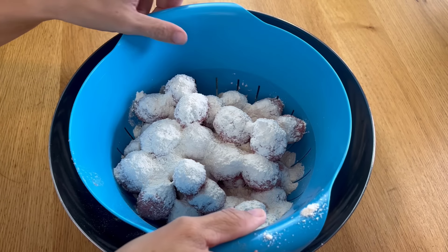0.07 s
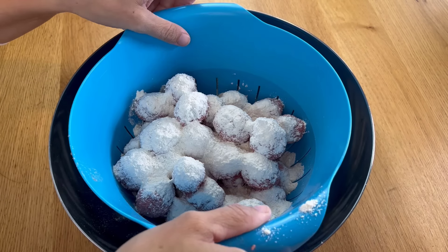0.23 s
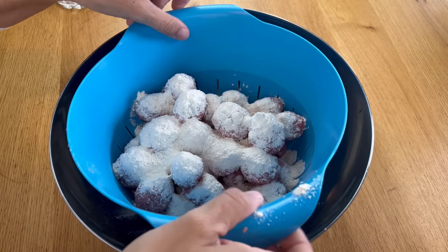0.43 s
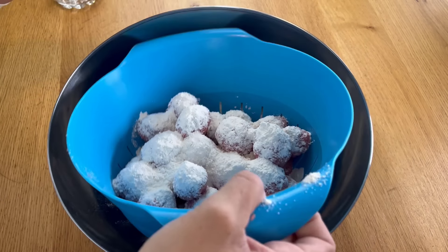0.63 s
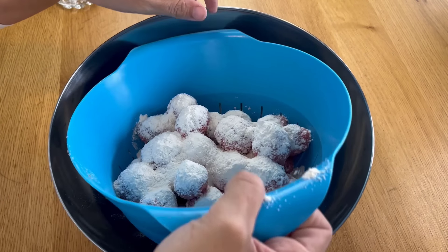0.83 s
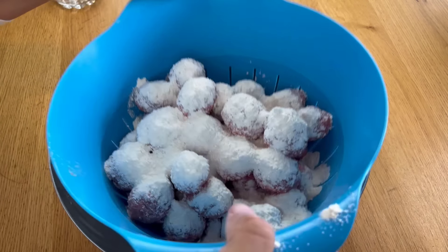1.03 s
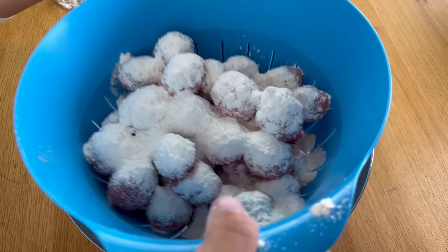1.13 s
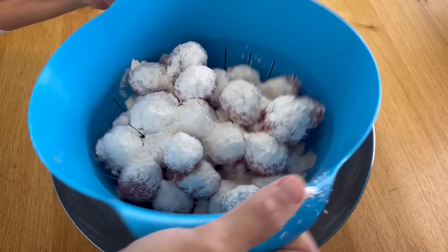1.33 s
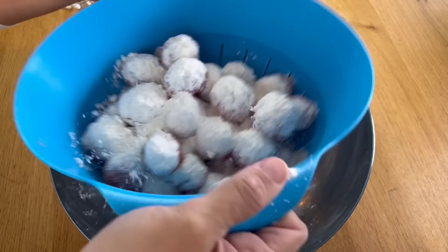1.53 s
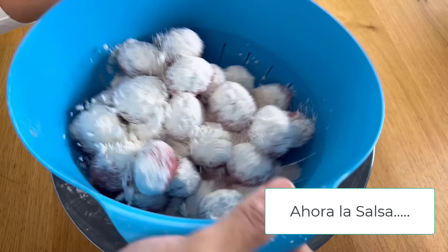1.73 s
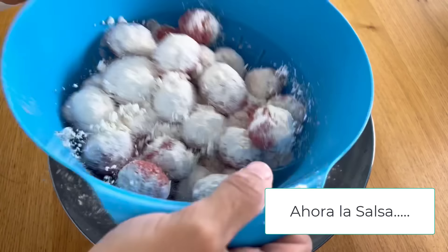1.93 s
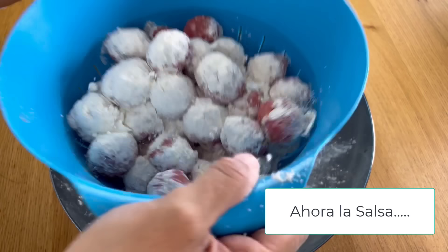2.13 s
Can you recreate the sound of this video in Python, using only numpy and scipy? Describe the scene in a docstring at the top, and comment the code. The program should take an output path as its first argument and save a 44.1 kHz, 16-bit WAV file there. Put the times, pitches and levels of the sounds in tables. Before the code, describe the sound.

Close up at a wooden kitchen table, faint scraping grows into a cluster of clattering plastic-on-metal knocks; afterwards coated balls slide and tap softly in the colander, with low air thumps and two wall snaps.

```python
"""Close microphone at a wooden table: a plastic colander of floured meatballs is worked loose from a metal bowl.
It rubs in the bowl, stick-slip grains ringing the shared modes over low rumble, sway and room noise; amid the
rubbing, blows knock those modes and a rasp swells. Lifted and shaken, the balls rustle as fine grains and tick as
very short rings; each toss swings slow air at the microphone, and twice the wall snaps with a ring, falling wave,
click and thump."""
import sys
import numpy as np
from scipy import signal
from scipy.fft import rfft, irfft
from scipy.io import wavfile

SR = 44100
rng = np.random.default_rng(int(sys.argv[2]) if len(sys.argv) > 2 else 0)


def unload_audio(sound):
    """Save the sound as a 16-bit wav file, at the path given as the first command line argument."""
    columns = np.transpose(np.atleast_2d(sound))
    # keep every value between -1 and 1, then stretch to whole-number steps
    steps = np.round(np.clip(columns, -1, 1) * 32767)
    wavfile.write(sys.argv[1], SR, steps.astype(np.int16))


N = 96226


def undb(db):
    """Decibels to amplitude."""
    return 10 ** (np.asarray(db, float) / 20)


def unit(x):
    """Scale to an RMS of one."""
    return x / np.sqrt(np.mean(x ** 2))


def curve(table, column):
    """Gain over time from a dB column; -120 dB outside the table."""
    rows = np.array(table, float)
    level_db = np.interp(np.arange(N) / SR, rows[:, 0], rows[:, column], left=-120, right=-120)
    return undb(level_db)


def ring(x, pitch_hz, t60_s):
    """One decaying mode driven by x: a two-pole resonator."""
    radius = np.exp(-np.log(1000) / (t60_s * SR))
    angle = 2 * np.pi * pitch_hz / SR
    return signal.lfilter([np.sin(angle)], [1, -2 * radius * np.cos(angle), radius ** 2], x)


def band(x, low_hz, high_hz):
    """Keep one band of frequencies."""
    return signal.sosfilt(signal.butter(2, [low_hz, high_hz], "band", fs=SR, output="sos"), x)


def colour(x, table):
    """Shape the spectrum by a table, falling away below its first frequency, at an RMS of one."""
    pitch_hz, level_db = np.array(table, float).T
    f = np.fft.rfftfreq(N, 1 / SR)
    gain = undb(np.interp(np.log(f + 1), np.log(pitch_hz), level_db))
    low_cut = np.minimum(f / pitch_hz[0], 1) ** 2
    return unit(irfft(rfft(x) * gain * low_cut, N))


def grains(per_s, spread_db):
    """Random clicks of uneven size."""
    struck = rng.random(N) < per_s / SR
    return struck * rng.standard_normal(N) * undb(spread_db * rng.exponential(size=N))


def push(peak_s):
    """Soft contact: a smooth bump of force that peaks after peak_s."""
    t = np.arange(400) / SR / peak_s
    return t * np.exp(1 - t) / (peak_s * SR * np.e)


def add(out, start_s, sound):
    """Lay a sound into the scene at its start."""
    i = int(start_s * SR)
    out[i:i + len(sound)] += sound[:N - i]


# Modes of colander and bowl together, rung by both rubbing and knocks: pitch_hz, level_db, t60_s
BODY_MODES = [(140.4, -10, 0.085), (176, -3, 0.053), (217.6, 4.5, 0.056), (289.3, -6, 0.11),
              (357.7, -2.5, 0.071), (455.3, -5.5, 0.086), (552, 4.5, 0.058), (614, 1, 0.092),
              (673, 0, 0.096), (805, 3, 0.028), (960, 0.5, 0.029), (1260, -6, 0.021), (1290, 7.5, 0.013),
              (1630, 0, 0.014), (2090, -11, 0.02), (2537, 0.5, 0.013), (2870, -11, 0.012),
              (4880, -22, 0.011), (6390, -2.5, 0.012), (6870, -4, 0.016)]


def body(x):
    """Colander and bowl ring together as a bank of modes of alternating sign."""
    out = np.zeros(N)
    for k, (pitch_hz, level_db, t60_s) in enumerate(BODY_MODES):
        out += (-1) ** k * undb(level_db) * ring(x, pitch_hz, t60_s)
    return out


# Colour of the fine scraping: pitch_hz, level_db
SCRAPE_COLOUR = [(300, -15), (558, -10.5), (730, -9.5), (1330, -10.5), (1960, -14), (2700, -18.5),
                 (3660, -28.5), (4800, -37), (6190, -52), (8530, -33.5), (11100, -41), (15500, -48)]
# Rubbing in the bowl: time_s, judder_level_db, scrape_level_db, thin_ring_level_db
RUBBING = [(0, -43, -44.5, -60), (.05, -55.5, -83.5, -104), (.07, -57, -62, -59), (.1, -55.5, -71, -81),
           (.16, -57, -59, -73), (.184, -53, -59, -70), (.232, -82, -64, -76.5), (.27, -51, -67, -62),
           (.33, -66, -67.5, -76), (.39, -58, -56.5, -67), (.44, -66, -65.5, -70), (.52, -63, -47.5, -67),
           (.545, -41, -52, -60), (.585, -39, -42, -71), (.6, -59, -72, -59), (.63, -41.5, -60, -54),
           (.66, -38, -43.5, -85), (.69, -42, -59, -63), (.705, -28.5, -52, -76), (.745, -28, -53, -50),
           (.765, -32, -57.5, -77), (.798, -42, -56, -80), (.806, -23, -62, -71), (.84, -26, -52, -81),
           (.87, -32, -49, -78), (.91, -38, -66, -70), (.95, -38.5, -64.5, -73), (1.0, -49, -81, -80),
           (1.04, -58, -87, -84), (1.065, -64, -108, -67), (1.1, -64, -73, -82), (1.15, -72, -110, -90)]
JUDDER_PER_S, JUDDER_PUSH_S, SCRAPE_PER_S = 400, 0.0023 / 4, 3300


def rubbing():
    """Stick-slip judder rings the body; fine scraping and a thin treble ring ride on it."""
    slips = np.convolve(grains(JUDDER_PER_S, 1.5), push(JUDDER_PUSH_S))[:N]
    judder = unit(body(slips))
    grit = grains(SCRAPE_PER_S, 1.3)
    scrape = colour(grit, SCRAPE_COLOUR) + 0.36 * unit(band(body(grit), 650, 3300))
    thin = unit(ring(grit, 6150, 0.0065) + 0.59 * ring(grit, 7140, 0.0029))
    return judder * curve(RUBBING, 1) + scrape * curve(RUBBING, 2) + thin * curve(RUBBING, 3)


# Low rumble of the table: time_s, level_db
TABLE_RUMBLE = [(0.0, -36), (0.1, -40.5), (0.24, -47), (0.45, -87), (0.75, -56), (0.92, -41.5),
                (1.1, -50.5), (1.31, -53), (1.84, -39.5), (2.1, -43)]


def rumble():
    """The table hums low: noise through one slow resonance."""
    return unit(ring(rng.standard_normal(N), 42.6, 0.9)) * curve(TABLE_RUMBLE, 1)


SWAY_DB, SWAY_HZ = -43, 8.04


def sway():
    """A faint, very low wander of pressure throughout: band-limited noise."""
    return undb(SWAY_DB) * unit(band(rng.standard_normal(N), SWAY_HZ / 2, SWAY_HZ * 3.1))


# Colour of the room's steady noise: pitch_hz, level_db
ROOM_COLOUR = [(60, -0.5), (200, -13.5), (400, -20), (870, -27.5), (1320, -29), (2600, -33.5),
               (4480, -56.5), (6120, -49), (8530, -53), (11100, -46), (15200, -48), (15500, -83)]
ROOM_DB = -57.5


def room_noise():
    """Steady coloured noise behind everything."""
    return undb(ROOM_DB) * colour(rng.standard_normal(N), ROOM_COLOUR)


# Knocks of colander on bowl: start_s, blow_peak_db, edge_gain_db, contact_ms (to the peak of force),
# lean_db (per octave, towards the upper modes)
KNOCKS_IN_BOWL = [(.122, -51, -63, 0.039, 0), (.173, -47, -66.5, 0.14, 3.5),
                  (.2532, -32, -54.5, 0.033, 4.5), (.284, -66, -61, 0.054, 1),
                  (.388, -55, -61.5, 0.18, 5.5), (.563, -20, -40.5, 0.066, 1), (.571, -19, -44.5, 0.15, .6),
                  (.6092, -18, -39.5, 0.096, 3.5), (.699, -23, -74, 0.41, -1), (.714, -33, -44, 0.38, -1.2),
                  (.728, -22, -58, 0.27, -3), (.740, -20.5, -52, 0.38, 2.1), (0.749, -23, -64, 0.53, 1.3),
                  (.8025, -16, -54, 0.18, 0), (.815, -21.5, -67, 0.36, 3.3), (.849, -20, -40.5, 0.14, 0.6),
                  (.937, -30.5, -66, 0.74, -1.8), (.98, -61, -84, 0.11, -4)]
EDGE_S, SPOT_SPREAD_DB = 0.0041, 1


def knocks():
    """A blow and a short gritty edge ring the body; each spot struck favours other modes."""
    out, t = np.zeros(N), np.arange(7000) / SR
    pitch_hz, mode_db, t60_s = np.array(BODY_MODES, float).T[:, :, None]
    for start_s, blow_db, edge_db, contact_ms, lean_db in KNOCKS_IN_BOWL:
        lean = lean_db * np.log2(pitch_hz / 600) * (pitch_hz < 4000)  # the highest modes do not lean
        spot = undb(mode_db + lean + SPOT_SPREAD_DB * rng.standard_normal(pitch_hz.shape))
        phase_cycles = 0.5 + 0.17 * rng.standard_normal(pitch_hz.shape)
        waves = np.sin(2 * np.pi * (pitch_hz * t + phase_cycles))
        modes = np.sum(spot * waves * 1000 ** (-t / t60_s), axis=0)
        blow = signal.fftconvolve(push(contact_ms / 1000), modes)
        grit = rng.standard_normal(1500) * np.exp(-t[:1500] / EDGE_S)
        rung_edge = signal.fftconvolve(band(grit, 1030, 10000), modes) / 6
        bare_edge = 0.38 * np.pad(band(grit, 4800, 15000), (0, 6999))
        add(out, start_s, undb(blow_db) * blow / np.abs(blow).max())
        add(out, start_s, undb(edge_db) * (rung_edge + bare_edge))
    return out


RASP_START_S, RASP_STOP_S, RASP_RISE_S = 0.624, 0.7, 0.083  # cut before the full rise
RASP_DB, RASP_T60_S = -41.5, 0.01


def rasp():
    """Rim on rim: quick grit rings two bands, swelling and cut short."""
    grit, t = grains(3000, 0.92), np.arange(N) / SR
    rasping = (t > RASP_START_S) & (t < RASP_STOP_S)
    swell = np.where(rasping, (t - RASP_START_S) / RASP_RISE_S, 0)
    low = unit(ring(grit, 1430, RASP_T60_S))
    high = unit(ring(grit, 2530, RASP_T60_S))
    return undb(RASP_DB) * swell * unit(0.86 * low + high)


# Colour of flour and crust on plastic: pitch_hz, level_db
FLOUR_COLOUR = [(90, 0), (150, 6), (343, 1.5), (735, -6.5), (1300, -5), (1600, -7), (2000, -6.5),
                (2500, -10), (3150, -8), (4000, -15), (7330, -16), (8530, -14), (15500, -40)]
# Balls and flour sliding in the lifted colander: time_s, level_db, treble_level_db
SLIDING = [(1.1, -95, -108), (1.17, -59.5, -83), (1.25, -62, -82), (1.29, -63.5, -79), (1.38, -64, -82),
           (1.44, -55.5, -66.5), (1.48, -50.5, -69), (1.5, -73, -83), (1.55, -57, -70.5), (1.6, -76, -80),
           (1.66, -55.5, -71), (1.69, -53.5, -63.5), (1.725, -45, -57.5), (1.74, -57, -78),
           (1.785, -57.5, -71), (1.81, -72, -82), (1.85, -52.5, -64.5), (1.9, -55.5, -66),
           (1.935, -78, -81), (1.95, -51.5, -63), (1.97, -46.5, -63.5), (1.99, -59, -70), (2.002, -72, -86),
           (2.022, -64, -74), (2.035, -53, -76), (2.05, -127, -96), (2.085, -49, -70), (2.13, -122, -78),
           (2.18, -85, -81)]
RUSTLE_PER_S = 3000


def rustle():
    """Dense fine grains of flour and crust on plastic, with a separate treble layer."""
    grit = colour(grains(RUSTLE_PER_S, 1.7), FLOUR_COLOUR)
    main = unit(band(grit, 96, 4040))
    treble = unit(band(grains(RUSTLE_PER_S, 1.5), 3000, 8400))
    return main * curve(SLIDING, 1) + treble * curve(SLIDING, 2)


# Ticks of balls on the colander wall: start_s, ring_peak_db, pitch_hz, click_gain_db
WALL_TICKS = [(1.134, -44.5, 5830, -60.5), (1.142, -38, 1460, -73), (1.291, -44.5, 1980, -67),
              (1.466, -42, 3200, -52), (1.482, -34, 2900, -60), (1.535, -36, 1260, -42.5),
              (1.601, -39.5, 2830, -63), (1.71, -28, 3200, -53), (1.729, -46, 1300, -55),
              (1.748, -33.5, 2896, -47), (1.912, -30.5, 563, -62), (1.953, -30, 2800, -57),
              (1.97, -43, 3020, -51), (1.985, -34, 3250, -52), (2.021, -36, 2010, -69),
              (2.0285, -34.5, 700, -39.5), (2.069, -39, 515, -60)]
TICK_CYCLES = 5.5  # cycles of ring to fall by 60 dB


def ticks():
    """A ball taps the wall: a noise click with a very short ring at its own pitch."""
    out, t = np.zeros(N), np.arange(900) / SR
    for start_s, level_db, pitch_hz, click_db in WALL_TICKS:
        tone = np.sin(2 * np.pi * pitch_hz * t) * 1000 ** (-t * pitch_hz / TICK_CYCLES)
        click = band(rng.standard_normal(900), 1100, 6800) * np.exp(-t / 0.00077)
        add(out, start_s, undb(level_db) * tone + undb(click_db) * click)
    return out


# Swings of air from the tosses: centre_s, peak_pressure (signed, full scale 1), spread_s (Gaussian sigma)
TOSS_AIR = [(1.282, 0.036, 0.022), (1.382, -0.18, 0.019), (1.54, 0.084, 0.085), (1.59, -0.21, 0.023),
            (1.765, .14, 0.033), (1.804, -0.28, 0.018), (1.866, -0.076, 0.01), (1.958, 0.25, 0.023),
            (2.028, -.26, 0.019), (2.107, -0.097, 0.032), (2.19, 0.26, 0.0385)]


def air():
    """Each toss pushes a slow bump of pressure at the close microphone."""
    t = np.arange(N) / SR
    return sum(p * np.exp(-0.5 * ((t - centre_s) / spread_s) ** 2) for centre_s, p, spread_s in TOSS_AIR)


# Snaps of the wall: start_s, ring_level_db, ring_pitch_hz, ring_t60_s, wave_level_db,
# click_gain_db, click_decay_s, thump_gain_db
WALL_SNAPS = [(1.5838, -23, 2850, 0.0043, -49, -33, .00006, -22.5),
              (1.8379, -23.5, 3380, 0.01, -20.5, -12.5, 0.00037, -12.5)]
WAVE_HIGH_HZ, WAVE_LOW_HZ, WAVE_FALL_S, WAVE_T60_S = 4080, 934, 0.00167, 0.016
THUMP_RISE_S, THUMP_DECAY_S = 0.000086, 0.0016


def snaps():
    """The wall snaps: a short ring, a bending wave falling in pitch, a click and a one-sided thump."""
    out, t = np.zeros(N), np.arange(2000) / SR
    wave_hz = WAVE_LOW_HZ + (WAVE_HIGH_HZ - WAVE_LOW_HZ) * np.exp(-t / WAVE_FALL_S)
    wave = np.sin(2 * np.pi * np.cumsum(wave_hz) / SR) * 1000 ** (-t / WAVE_T60_S)
    thump = (1 - np.exp(-t / THUMP_RISE_S)) * np.exp(-t / THUMP_DECAY_S)
    for start_s, ring_db, ring_hz, t60_s, wave_db, click_db, click_s, thump_db in WALL_SNAPS:
        noise = rng.standard_normal(2000) * np.exp(-t / click_s)
        noise = noise / np.sqrt(np.sum(noise ** 2))  # equal energy at any length
        click = 2 * band(noise, 4800, 8330) + 0.12 * noise
        crack = np.sin(2 * np.pi * ring_hz * t) * 1000 ** (-t / t60_s)
        add(out, start_s, undb(ring_db) * crack + undb(wave_db) * wave)
        add(out, start_s, undb(click_db) * click + undb(thump_db) * thump)
    return out


ECHO_DB, ECHO_T60_S = -9.5, 0.44


def echo(near):
    """The room answers with a decaying noise tail of unit energy, 0.4 s long."""
    t = np.arange(int(0.4 * SR)) / SR
    tail = band(rng.standard_normal(len(t)), 167, 13500) * 1000 ** (-t / ECHO_T60_S)
    return undb(ECHO_DB) * signal.fftconvolve(near, tail / np.sqrt(np.sum(tail ** 2)))[:N]


def scene():
    """Contact sounds with their echo; snaps, air and low layers reach the microphone without it."""
    near = rubbing() + knocks() + rasp() + rustle() + ticks()
    background = rumble() + sway() + room_noise()
    return (near + echo(near) + background + air() + snaps())[None]


TOP_HZ = 15900


def record(dry):
    """The phone cuts the top."""
    return signal.sosfilt(signal.ellip(8, 0.2, 70, TOP_HZ, fs=SR, output="sos"), dry)


dry = scene()
out = record(dry)
unload_audio(out)
```